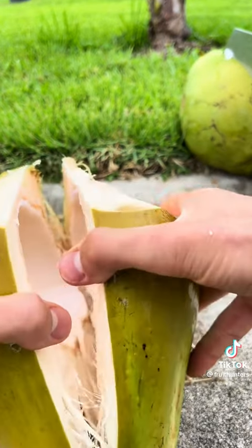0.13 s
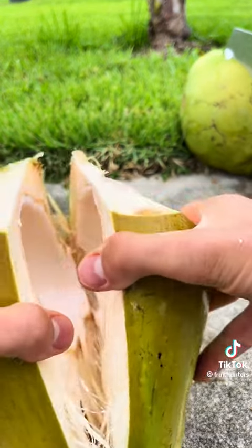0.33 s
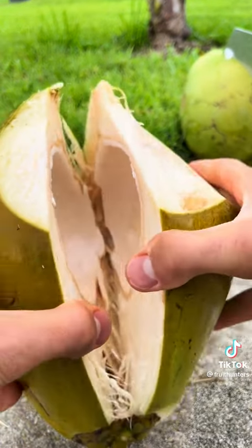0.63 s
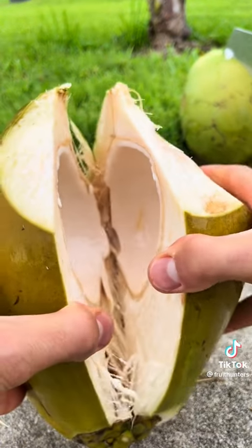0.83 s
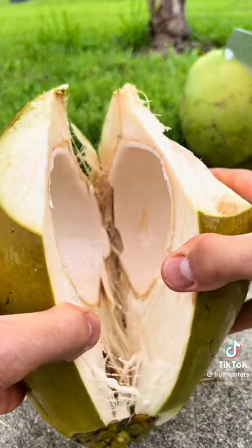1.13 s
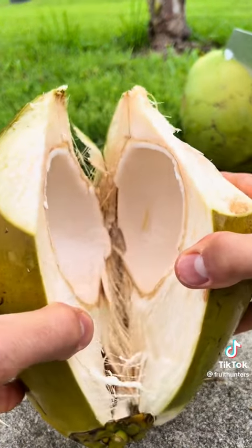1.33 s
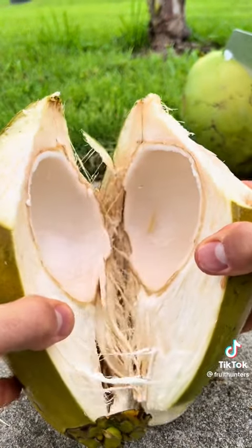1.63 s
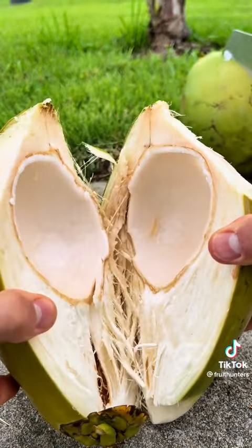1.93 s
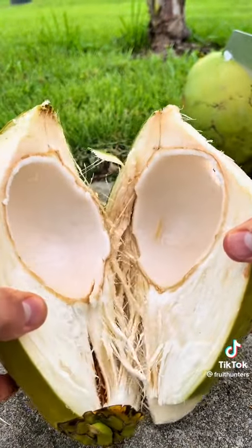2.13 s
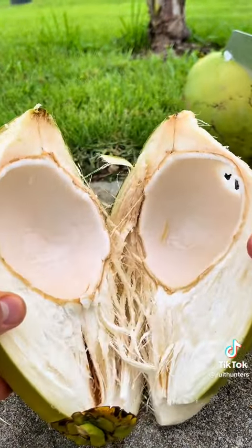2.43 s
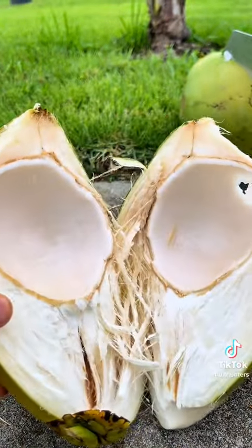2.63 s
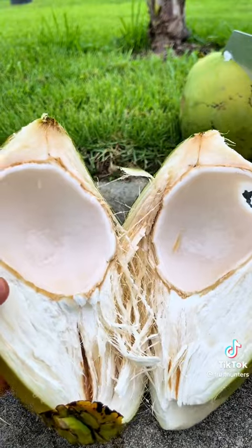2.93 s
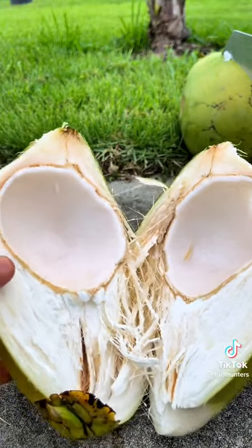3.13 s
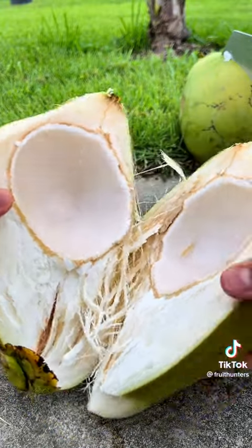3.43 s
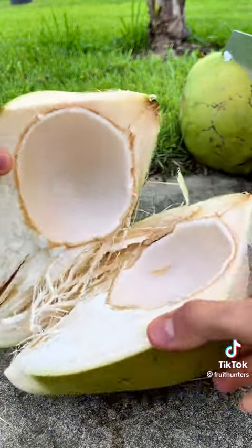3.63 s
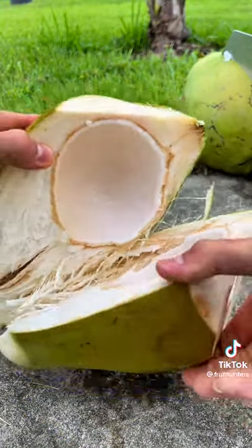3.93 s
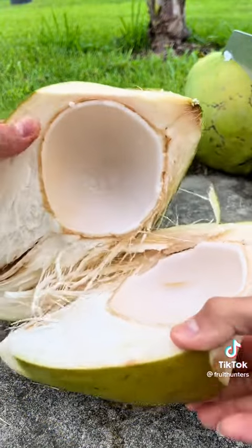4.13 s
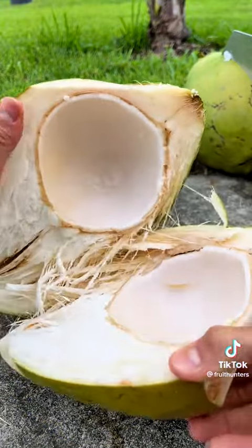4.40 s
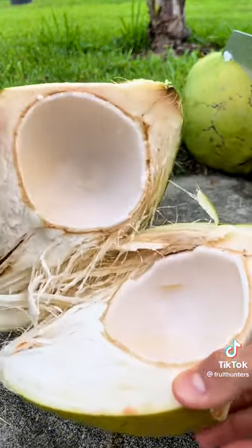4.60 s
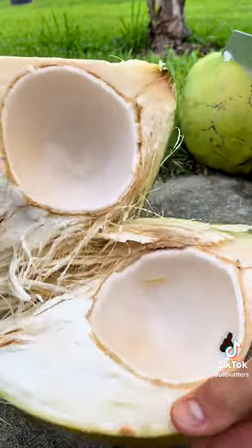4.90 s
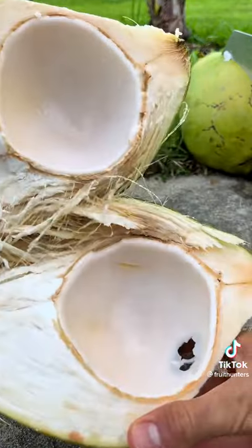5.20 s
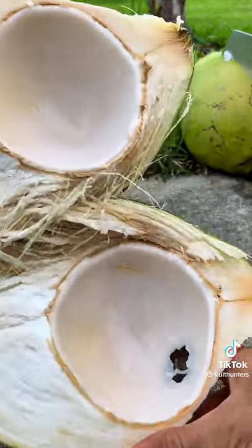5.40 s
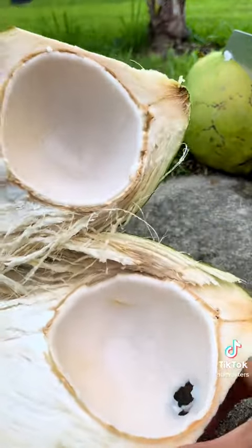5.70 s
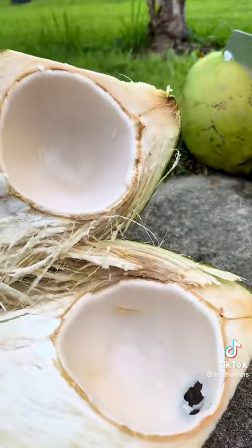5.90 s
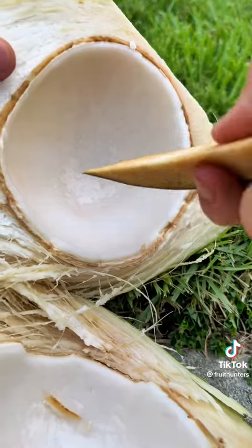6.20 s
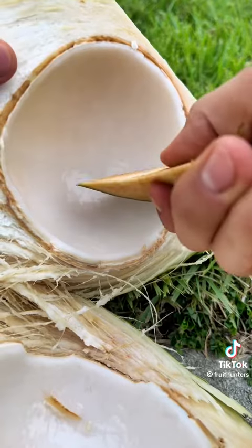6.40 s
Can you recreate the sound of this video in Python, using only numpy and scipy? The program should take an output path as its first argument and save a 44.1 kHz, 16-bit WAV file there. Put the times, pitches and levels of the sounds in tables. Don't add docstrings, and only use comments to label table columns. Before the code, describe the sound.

Hands tear a fibrous green coconut over a hard slab, close and dry. A loud snap opens a run of crunchy tearing and sparse pops; a quieter middle holds light rubbing, faint bird whistles and a far engine. Deep cracks burst out, followed by crisper stringy snaps, before only outdoor air, faint insects and tiny scuffs remain.

```python
import sys
import numpy as np
from scipy import signal
from scipy.fft import rfft, irfft, next_fast_len
from scipy.io import wavfile
from scipy.ndimage import uniform_filter1d

SR = 44100
rng = np.random.default_rng(int(sys.argv[2]) if len(sys.argv) > 2 else 0)


def boost(x):
    u = np.asarray(x, float) / 20
    return 10 ** u


def wav_record(signal):
    frames = np.transpose(np.atleast_2d(signal))
    bounded = np.clip(frames, -1, 1)
    quanta = np.round(bounded * 32767).astype(np.int16)
    wavfile.write(sys.argv[1], SR, quanta)


N = 288855

# lowest f/Hz, highest f/Hz, burst decay/s, level/dB
PARTS = [
    (191, 1480, 0.0017, -3),
    (1330, 3680, 0.0023, -4),
    (4310, 16000, 0.00096, -0.47),
    (9400, 28000, 0.0011, -6.5),
]


def evened(x):
    return x / np.sqrt(np.mean(x ** 2) + 1e-20)


def read(points, hz):
    f, value = np.transpose(points)
    return np.interp(np.log(hz + 1), np.log(f + 1), value)


def columns(rows, off=None):
    t, *values = np.transpose(rows)
    return [np.interp(np.arange(N) / SR, t, v, off, off) for v in values]


def add(mix, s, sound):
    part = mix[..., round(s * SR):][..., :sound.shape[-1]]
    part += sound[..., :part.shape[-1]]


def drift(hz):
    t = np.arange(0, N + 64, 64) / SR
    rates = np.geomspace(hz / 10, hz, num=14)
    slow = sum(np.sin(2 * np.pi * (f * t + rng.random())) / np.sqrt(f) for f in rates)
    return np.interp(np.arange(N) / SR, t, evened(slow))


def resonate(x, hz, width_hz):
    turn = np.exp(2j * np.pi * np.cumsum(hz * np.ones(x.shape[-1])) / SR)
    r = np.exp(-np.pi * width_hz / SR)
    return 2 * (turn * signal.lfilter([1 - r], [1, -r], x / turn)).real


def engine():
    # t/s, firing f/Hz, level/dB
    running = [(0, 126.8, -47.5), (.2, 130.4, -44.5), (.42, 131.4, -56), (.52, 131.1, -40),
               (.82, 111, -43.5), (.95, 110.2, -39.5), (2.52, 117.6, -37), (2.83, 118, -32.5),
               (3.12, 120.6, -33), (3.47, 122.9, -25), (3.83, 125.4, -32.5), (3.95, 127.6, -30),
               (5.08, 134.6, -31.5), (5.52, 117.1, -33.5), (5.59, 114.9, -43), (5.7, 110.6, -37),
               (5.8, 110.8, -48), (5.94, 107.3, -33.5)]
    gear = 0.623
    boom_hz, boom_width_hz, boom_db = 73.2, 9.2, 8.5
    hz, firing_db = columns(running)
    geared_db = -50 + boom_db / (1 + (2 * (gear * hz - boom_hz) / boom_width_hz) ** 2)
    orders = [(1, firing_db), (gear, geared_db), (1 + gear, 0.39 * firing_db - 43.0)]
    phase = 2 * np.pi * np.cumsum(hz) / SR
    tones = 0
    for order, db in orders:
        wavering = boost(db + 1.2 * drift(hz=18))
        tones = tones + wavering * np.sin(order * phase + 0.38 * drift(hz=8.5))
    stop = np.clip((running[-1][0] - np.arange(N) / SR) / 0.0077, 0, 1)
    return np.sqrt(2) * tones * stop


def hum():
    # f/Hz, level/dB
    hum_tones = [(45.1, -44.5), (55.6, -52.5), (165.5, -60.5)]
    t = np.arange(N) / SR
    return sum(np.sqrt(2) * boost(db + drift(hz=3.8)) * np.sin(2 * np.pi * hz * t + drift(hz=2.5) / 2)
               for hz, db in hum_tones)


def air():
    # f/Hz, level/dB per Hz
    wash = [(22, -30), (38, 0), (100, -3), (238, -15.5), (533, -27), (817, -31), (1200, -38.5),
            (1950, -39.5), (2400, -43), (5200, -51), (7800, -42), (9000, -70), (12000, -65), (15500, -65)]
    # f/Hz, likeness from 0 to 1
    likeness = [(150, 1.0), (380, 0.93), (950, 0.15), (1750, 0.65), (2900, .35), (4100, .55), (5980, 0.17),
                (15000, 0.0)]
    frames, hz = N // 512 + 5, np.fft.rfftfreq(2048, 1 / SR)
    a, b, c, d, patches = rng.standard_normal((frames, len(hz), 5)).T
    patches = uniform_filter1d(uniform_filter1d(patches, size=14, axis=0), size=7, axis=1)
    colour = boost(read(wash, hz)[:, None] + 2.08 * evened(patches))
    same = np.clip(read(likeness, hz), -1, 1)[:, None]
    left = a + 1j * b
    right = same * left + np.sqrt(1 - same ** 2) * (c + 1j * d)
    z = np.array([left, right]) * colour
    return boost(-40) * evened(signal.istft(z, nperseg=2048, noverlap=1536)[1][:, :N])


def insects():
    clicks = rng.standard_normal((2, N)) * boost(2 * drift(hz=114.0))
    band = signal.butter(4, [7000, 8000], "band", fs=SR, output="sos")
    wide = signal.sosfilt(band, clicks)
    line = resonate(wide, 7440 + 40 * drift(hz=4.3), 90)
    near_s, near_length_s = 6.28, 0.073
    call_db = 5.5 * np.exp(-((np.arange(N) / SR - near_s) / near_length_s) ** 2)
    level = boost(-66 + call_db + 0.4 * drift(hz=1.62))
    return level * (0.33 * evened(wide) + 1.0 * evened(line))


def breaks():
    # t/s, energy
    # level/dB, thinness/dB (hair over shell-bound strand), husk grip/dB
    fibre_breaks = [(0.384, -23, 14, 17), (0.6271, -16.5, -12.5, 3.5), (1.13, 4, 2, 3), (1.1457, -26, -3, 2),
                    (1.168, -15.5, -12.5, 3), (1.209, -21, -14, 11), (1.2701, -15, 16, 8),
                    (1.2879, -12, 11, 13), (1.3054, -9, -5.8, 19), (1.3336, -13, 15, 8), (1.3835, -11, 12, -2),
                    (1.3904, -13, 18, 0), (1.418, -15, 5, 3), (1.4518, -9.5, 17, 3), (1.4597, -10, 6, -4),
                    (1.5024, -11, -3, 11), (1.522, -12, -2, -3), (1.542, -10.5, 6, -10), (1.5598, -11.5, -3, 6),
                    (1.6092, -13, 16, 9), (1.623, -7, -6, 9), (1.647, -9.5, -6.5, -5), (1.682, -11, 8, -10),
                    (1.6953, -7.5, 0, 1.5), (1.7142, -14, 14.4, -10), (1.7325, -10, 6, 0), (1.753, -8, 3, 5.5),
                    (1.7609, -11.5, 6, -5),
                    (1.8137, -18, 24, -11), (1.8252, -13, 2, -13), (1.909, -17.5, 0, -4),
                 (1.9442, -6.5, 1.4, 16), (2.0061, -7.5, 1, 6), (2.0308, -18, 8, 4), (2.084, -17, -5, -7),
                 (2.0972, -10, 32, -9), (2.1718, -8, 14, -3), (2.208, -14.5, 7, -2), (2.234, -14, 8, -9),
                 (2.331, -16, 16.1, 7), (2.3797, -1, -4, -9), (2.3913, -9.5, 0, -5), (2.437, -20, 19, -8),
                 (2.4599, -18, -22, 13), (2.469, -14.5, 15, -8), (2.512, -3.5, -0.3, -10),
                 (2.5326, -9, 6, 8), (2.5597, -13, 6, -12), (2.5791, -13, 5, -10), (2.6022, -13, 0.5, -15),
                 (2.6163, -10, 0, 9), (2.6363, -10, 17, 4), (2.6736, -12, 4, 5.5), (2.7488, -14, 8, 2),
                 (2.8166, -16, 9, -26), (2.8824, -12, 10.5, -7),
                    (3.2711, -28, -1, -12), (3.2879, -25.5, 4, 0), (3.3905, -23, -29, -13),
                (3.5296, -17.5, -4, 0), (4.1964, -13, 13.5, -4), (4.2234, -16, 20, -9),
                (4.2771, -23, -5, 3), (4.3045, -17.5, -15, -2), (4.3147, -12.5, 6, -7),
                (4.339, -13.5, 1.5, -5), (4.4075, -16, -20, 3), (4.4285, -21, 14, -4), (4.4378, -14, 3, 1),
                (4.4505, -13, 9, 3), (4.4985, -22, 18, -10), (4.5085, 2.5, 1, 0.5), (4.538, -24, 16, -2.5),
                (4.5435, -10, -11, -14), (4.5709, 5, -3, -9), (4.5829, -11, 21, -8), (4.5886, -12.5, 7, -6),
                (4.602, -12, 10, 6), (4.6311, -12.5, 5, 7), (4.6427, -8, 30, 14), (4.657, -6, -2, 1),
                (4.6689, 2, -8, -1), (4.422, -21, 6, 3), (4.7045, -19, 10.3, -19),
                    (4.9022, -15, 9, -6), (4.9148, -17, -2, 1), (4.9567, -8.5, 10, 6.5), (4.9806, -10, 11, 4.5),
                (5.0236, -14, 8, 1.5), (5.0468, -12.5, 3, 6.5), (5.0607, -11.5, 11, -3),
                (5.0829, -8.5, 9, 7), (5.095, -12, 26, -10.5), (5.1106, -13, 6, -11), (5.122, -17, 6, -0.5),
                (5.1331, -14, 9, -4), (5.1499, -14, 5, 2), (5.169, -2.5, 29, 0), (5.207, -15, 5, -2),
                (5.2196, -9.5, 17, -6), (5.2315, -6, 9, 0), (5.2468, -10, -5, -2), (5.2677, -17.5, 4, -5),
                (5.2762, -26, 9.2, -3), (5.3206, -10, 4.5, 3.8), (5.332, -20, 1.7, 5),
                (5.388, -16.5, -9, 16), (5.4465, -18, 4, 6.5),
                    (0.488, -27.5, -3, 19), (0.6005, -34.5, 14, 6), (5.1643, -10, 9, -2), (3.409, -23, -24, -10),
              (3.592, -26, -16, 3), (1.0884, -31, 11, 6), (1.1095, -25, 16, 7.5), (1.7906, -15.5, 11, -10),
              (1.887, -17.5, 9, 5), (1.9852, -14.5, 5, 3), (2.259, -14.5, 2, 3), (2.2828, -16, 6, -2),
              (2.305, -15, 0, -3), (2.319, -14, -3, 4), (2.343, -12, 24, -2), (2.714, -23, 8.5, -8),
              (4.5043, -8, 7, -4), (5.495, -32, 12.5, -12), (4.5474, -9, 16, -8), (6.061, -39, 25.5, -11),
              (1.328, -14, 9, 5), (1.358, -25, 3, 5), (1.413, -17, 8, 0), (1.566, -19, 1, -2),
              (1.596, -24, 5, 0), (1.637, -15, -4, 2), (1.464, -11, -9, -2), (2.146, -22, 5, 0),
              (2.158, -21, 18, -2), (2.356, -15, 10, 0), (2.448, -16.5, 16, -4), (1.677, -19, 12, -4),
              (4.617, -17, -1, 3), (4.949, -23, 12, -3), (2.11, -15, 16, -6), (5.156, -15, 16, -7),
              (5.316, -17.5, 15, -3), (5.357, -31, 10, 1), (0.945, -38, 22, -10), (1.7378, -14, 14, -6),
              (1.118, -31, 24, -10), (3.535, -24, 5, 10), (2.395, -21, 9, -5)]
    rows = fibre_breaks
    s, energy_db, thin_db, grip_db = np.transpose(rows)
    parts_db = np.array([-thin_db / 2, grip_db, thin_db / 2])
    return s, energy_db + parts_db - parts_db.max(0)


def give(decay):
    t = np.arange(512) / SR - .002
    return np.exp(-np.where(t < 0, -1.1 * t, t) / decay)


def snaps():
    times, parts_db = breaks()
    faint_db = np.minimum(0.45 * (parts_db[2] + 18.5), 0)
    parts_db = [*parts_db, parts_db[2] + faint_db]
    force = np.zeros((len(PARTS), 2, N))
    steps = rng.standard_normal((len(times), len(PARTS), 2, 512)) ** 3
    steps[..., 88] = 17 * np.sign(steps[..., 88])
    for k, (_, _, decay, _) in enumerate(PARTS):
        puffs = steps[:, k] * give(decay)
        puffs /= np.linalg.norm(puffs, axis=2, keepdims=True)
        for s, db, puff in zip(times, parts_db[k], puffs):
            add(force[k], s - .0023, boost(db) * puff)
    return force


def slides():
    # t/s, length/s, level/dB, dry hiss relative level/dB
    rubs = [(0.406, 0.08, -58.5, -20), (3.186, 0.24, -67, -6.5), (3.293, 0.091, -58, -9),
            (3.495, 0.07, -52, -34), (3.558, 0.11, -54, -8.5), (3.678, 0.07, -57.5, -5),
            (3.814, 0.15, -59, -12), (3.991, 0.18, -64.5, -15), (4.828, 0.1, -53, -22),
            (5.703, 0.12, -60.5, -21), (5.99, 0.2, -66, -7)]
    rise, fade_db, end_db = 0.36, -1.5, -14
    curves = []
    for s, length, db, dry_db in rubs:
        hiss_db = db + dry_db
        curves.append([(s - rise * length, db + fade_db, hiss_db + fade_db + end_db),
                       (s, db, hiss_db),
                       (s + (1 - rise) * length, db + fade_db, hiss_db + fade_db + end_db / 2),
                       (s + length, db + end_db, hiss_db + 2 * end_db)])
    return curves


def pulls():
    # t/s, effort level/dB
    tears = [
        [(1.07, -86), (1.26, -47), (1.49, -38), (1.76, -45.5), (1.775, -59)],
        [(1.78, -59), (1.81, -46.5), (2.2, -49), (2.774, -61), (2.92, -75)],
        [(4.17, -72), (4.4, -64.5), (4.548, -47), (4.69, -43.5), (4.77, -72)],
        [(4.82, -66), (5.1, -48.5), (5.28, -53), (5.47, -68)],
    ]
    return [[(s, -16 + 0.75 * db, db) for s, db in rows] for rows in tears]


def strain(after=0.014):
    s, energy_db = breaks()
    kicks = np.zeros(N)
    kicks[np.round(s * SR).astype(int)] = np.sqrt(boost(np.max(energy_db, 0)))
    t = np.arange(-400, 3000) / SR
    wake = signal.oaconvolve(kicks, np.exp(-np.where(t < 0, -4 * t, t) / after))[400:][:N]
    return 1 + wake / (uniform_filter1d(wake, size=7000) + 1e-3)


def crackle(tables, per_s, spread_db, bunching, trim_db):
    shell_db, fibre_db = np.max([columns(rows, -150) for rows in tables], 0)
    happens = rng.random(N) < per_s / SR
    size = happens * boost(spread_db * np.minimum(rng.exponential(1, N), 3.0))
    force = np.zeros((len(PARTS), 2, N))
    for k, level_db in enumerate([shell_db, (shell_db + fibre_db) / 2, fibre_db, fibre_db]):
        power = (size * boost(2.4 * rng.standard_normal(N))) ** 2
        rattle = np.sqrt(abs(signal.oaconvolve(power, give(PARTS[k][2] * .95) ** 2)[:N]))
        envelope = boost(level_db + trim_db[k]) * bunching * evened(rattle)
        force[k] = envelope * rng.standard_normal((2, N))
    return force


def part_response(lo_hz, hi_hz, rings, lag=.0012):
    # f/Hz, level/dB per Hz
    nut = [(150, -46.5), (250, -8), (298, -16), (416, -6), (899, -6.5), (1230, -8.5), (1880, -6.5),
           (3290, -10), (4200, -12.5), (8180, -10.5), (9750, -20.5), (14900, -23.5), (16500, -37)]
    hz = np.fft.rfftfreq(4096, 1 / SR)
    level_db = read(nut, hz) + sum(db / (1 + (2 * (hz - f) / w) ** 2) for f, w, db in rings)
    band = 1 / np.sqrt((1 + (lo_hz / (hz + 1)) ** 6) * (1 + (hz / hi_hz) ** 6))
    log_gain = np.log(boost(level_db) * band + 1e-5)
    phase = -signal.hilbert(np.r_[log_gain, log_gain[-2:0:-1]]).imag[:len(hz)]
    phase -= 2 * np.pi * lag * 1000 * np.log(np.maximum(hz, 200))
    ring = irfft(np.exp(log_gain + 1j * phase))[:2048]
    return ring / np.linalg.norm(ring)


def body(force):
    # f/Hz, width/Hz, level/dB
    shell_rings = [(552.8, 850, 3), (940, 190, 4), (1790, 220, 0), (2740, 670, 4.5), (4180, 370, 4.5),
                   (6600, 1500, 3)]
    # f/Hz, width/Hz, level/dB
    twist_rings = [(1360, 130, 4), (6350, 3400, 9)]
    wrung = np.arange(N) / SR > 4.78
    sound = np.zeros((2, N))
    for f, (lo_hz, hi_hz, _, db) in zip(force, PARTS):
        for stage, rings in [(~wrung, shell_rings), (wrung, twist_rings)]:
            response = part_response(lo_hz, hi_hz, rings)[None]
            sound += boost(db) * signal.oaconvolve(f * stage, response, axes=1)[:, :N]
    return sound


def dying_notes(rows, decay, trim_db, off_centre):
    t, out = np.arange(1500) / SR, np.zeros((2, N))
    for (s, db, hz), lean in zip(rows, rng.standard_normal(len(rows))):
        envelope = (1 - np.exp(-t / (0.53 * decay))) * np.exp(-t / decay)
        note = envelope * np.sin(2 * np.pi * hz * t)
        sides = np.array([[1], [off_centre * lean]])
        add(out, s + 0.4 * decay, boost(db + trim_db) * note / abs(note).max() * sides)
    return out


def twangs():
    # t/s, peak level/dB, f/Hz
    strands = [(0.626, -36, 2020), (1.1083, -38, 2570), (1.1289, -11, 2610), (1.144, -38, 2500),
               (1.1667, -32, 2200), (1.2092, -36, 2650), (1.272, -35, 2830), (1.287, -26, 2380),
               (1.312, -25, 1650), (1.3248, -26.5, 2820), (1.3578, -25.5, 2720), (1.39, -26, 2790),
               (1.4118, -28, 2780), (1.4516, -25, 2730), (1.501, -22.5, 2580), (1.5192, -31, 1730),
               (1.5586, -23.5, 2650), (1.5675, -23, 1930), (1.6225, -28, 3000), (1.6474, -26, 1790),
               (1.694, -22, 2910), (1.731, -26, 2850), (1.7508, -29, 2590), (1.9081, -32, 2220),
               (1.9435, -27, 1960), (2.0053, -30, 1490), (2.0305, -29, 1870), (2.159, -37, 1980),
               (2.1715, -24.5, 3030), (2.2071, -30, 2980), (2.2582, -31, 2580), (2.3047, -31, 2890),
               (2.3296, -33, 1700), (2.3444, -32, 3020), (2.355, -35, 2980), (2.3802, -22, 1650),
               (2.4583, -27.5, 2940), (2.4676, -31, 2590), (2.5115, -23, 2950), (2.5298, -32, 2560),
               (2.615, -32, 2400), (2.6363, -24.5, 2880), (2.6727, -29, 2950), (2.8817, -25, 2817),
               (4.4497, -29, 2200), (4.508, -10.5, 1960), (4.542, -26, 2270), (4.5697, -15, 1600),
               (4.601, -36, 2370), (4.6423, -35, 1886), (4.6683, -11, 1770), (5.2465, -26, 1500),
               (5.3208, -27, 1530), (6.101, -44.5, 3730)]
    # t/s, peak level/dB, f/Hz
    scuffs = [(5.7663, -48, 2940), (5.7777, -48, 2750), (5.7894, -49, 2600)]
    return dying_notes(strands + scuffs, .0012, -4, 1.2)


def knocks():
    # t/s, peak level/dB, f/Hz
    break_knocks = [(1.1295, -17, 1500), (1.289, -43, 716), (1.341, -34, 875), (1.392, -36, 810),
                    (1.414, -30, 810), (1.46, -26, 910), (1.501, -33, 888), (1.523, -36, 875), (1.56, -30, 635),
                    (1.633, -33, 942), (1.646, -30, 934), (1.681, -38, 835), (1.696, -21.5, 514), (1.73, -34, 910),
                    (1.756, -31, 929), (1.909, -37, 840), (1.943, -35, 595), (1.986, -37, 864), (2.006, -33, 727),
                    (2.029, -39, 886), (2.083, -31, 711), (2.148, -35, 900), (2.172, -34, 883),
                    (2.207, -32.5, 1420), (2.233, -37, 464), (2.304, -39, 1015), (2.318, -33, 706),
                    (2.354, -40, 1340), (2.3815, -14.5, 540), (2.38, -16, 950), (2.511, -21.5, 980),
                    (2.531, -33, 1360), (2.561, -28.5, 543.6), (2.601, -35, 1010), (2.673, -26, 946),
                    (4.407, -28.5, 900), (4.4415, -32, 1400), (4.508, -14.5, 692), (4.542, -20, 915),
            (4.57, -10, 890), (4.592, -32, 1140), (4.654, -26, 450), (4.67, -18, 911), (5.024, -36, 1060),
            (5.043, -32, 1500), (5.061, -35, 1460), (5.082, -32, 519.6), (5.152, -32, 1320),
            (5.206, -29.5, 1420), (5.231, -34, 1121), (5.246, -32, 945), (5.32, -28, 923)]
    # t/s, peak level/dB, f/Hz
    taps = [(3.389, -40, 1170), (3.409, -44, 751), (3.446, -44, 810), (3.46, -41, 1040), (3.494, -46, 1040),
            (3.508, -39, 980), (3.527, -40, 869), (3.54, -46, 1030), (3.59, -39, 961), (3.613, -43, 1280)]
    return dying_notes(break_knocks + taps, .0019, -3, 1.7)


def pings():
    # t/s, peak level/dB, f/Hz
    hairs = [(1.3828, -21.5, 4700), (1.4511, -17.5, 4910), (3.2863, -30, 7900), (4.508, -10, 4220),
             (4.5372, -24, 7360), (4.5697, -13.5, 8250), (4.6404, -17, 7270), (5.0599, -17, 5538),
             (5.0814, -20, 6860), (5.1492, -28, 6500), (5.1634, -11, 6600), (5.1682, -9, 6140),
             (5.2185, -19, 6030), (5.23, -24, 7104), (5.5992, -41, 7400)]
    return dying_notes(hairs, 0.00049, -2, 0.87)


def ports(mid, side):
    # f/Hz, phase/rad
    port_phase = [(1800, 0), (3000, .35), (4400, 0), (6200, -1.0), (14500, -1.5)]
    # f/Hz, level/dB
    port_spread = [(300, -22), (1100, -25), (2400, -14), (4400, -9), (8000, -10), (15000, -5.5)]
    size = next_fast_len(N)
    hz = np.fft.rfftfreq(size, 1 / SR)
    turn = np.exp(.5j * read(port_phase, hz))
    mid, side = rfft(mid, size), rfft(side, size) * boost(read(port_spread, hz))
    return irfft([mid * turn + side, mid / turn - side], size)[:, :N]


def slab_echo(near):
    t = np.arange(3000) / SR
    scatter = rng.standard_normal(len(t)) + 0.33 * rng.standard_normal((2, len(t)))
    scatter *= boost(-60 * t / 0.029) * (t > .002)
    return boost(-14.5) * signal.oaconvolve(near, scatter / np.linalg.norm(scatter[0]), axes=1)[:, :N]


def coconut():
    force = snaps()
    force += crackle(slides(), 1300, 2.0, boost(1.6 * drift(hz=90)), [0.5, 0.5, 9.5, 7])
    force += crackle(pulls(), 1050, 4.6, strain(), [-3.0, -2.0, -5.0, -5.0])
    mid, side = body(force) + twangs() + knocks() + pings()
    near = ports(mid, side)
    return near + slab_echo(near)


def bird():
    # t/s, length/s, from f/Hz, to f/Hz, level/dB
    chirps = [
        (2.985, 0.051, 2880, 3020, -63),
        (3.265, .055, 3100, 3030, -66),
        (3.432, 0.062, 2890, 2990, -60),
        (3.925, 0.07, 2720, 2870, -67.5),
    ]
    out = np.zeros((2, N))
    for s, length, from_hz, to_hz, db in chirps:
        hz = np.linspace(from_hz, to_hz, round(length * SR))
        breathy = evened(resonate(rng.standard_normal((2, len(hz))), hz, 90))
        tone = np.sin(2 * np.pi * np.cumsum(hz) / SR) + 0.66 * breathy
        add(out, s, boost(db) * signal.windows.tukey(len(hz), .6) * tone)
    return out


def scene():
    low_tones = (engine() + hum()) * boost([[.27], [-.27]])
    return low_tones + air() + insects() + coconut() + bird()


def band_limit(x):
    return signal.sosfilt(signal.butter(12, 16650, fs=SR, output="sos"), x)


def record(dry):
    bass_cut = signal.butter(6, 38.0, "high", fs=SR, output="sos")
    top_cut = signal.firwin(301, 16500, window=("kaiser", 8), fs=SR)
    mix = signal.sosfilt(bass_cut, dry)
    mix = 0.9 * np.tanh(mix / 0.9)
    mix = signal.oaconvolve(mix, top_cut[None], "same")
    return band_limit(mix)


dry = scene()
out = record(dry)
wav_record(out)
```